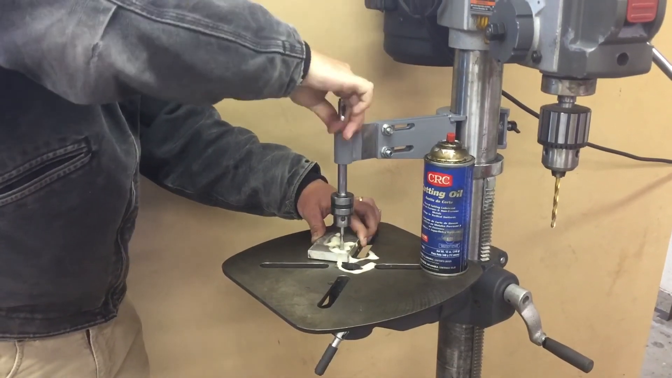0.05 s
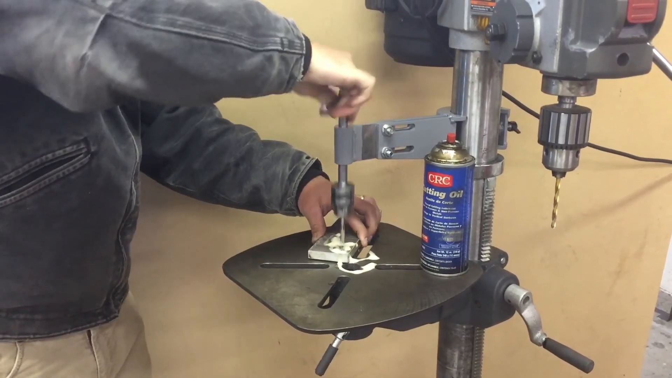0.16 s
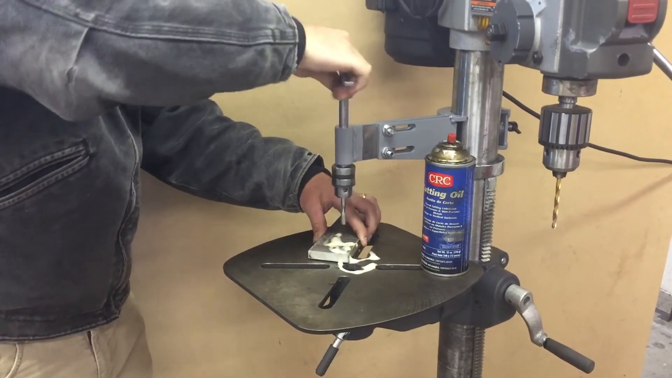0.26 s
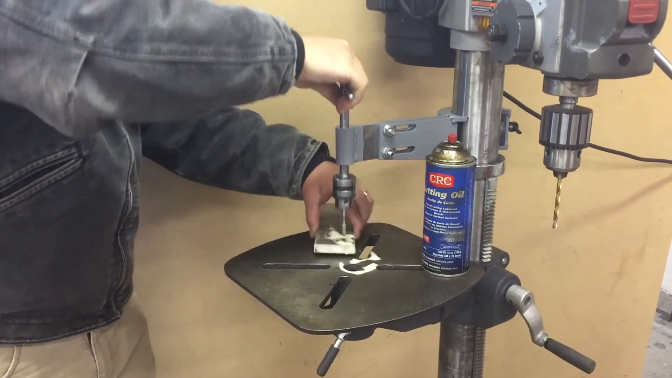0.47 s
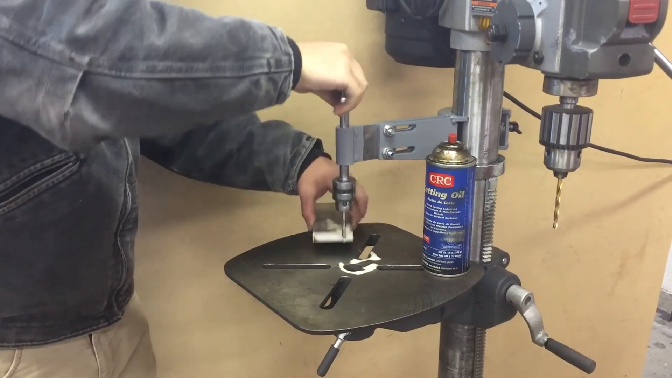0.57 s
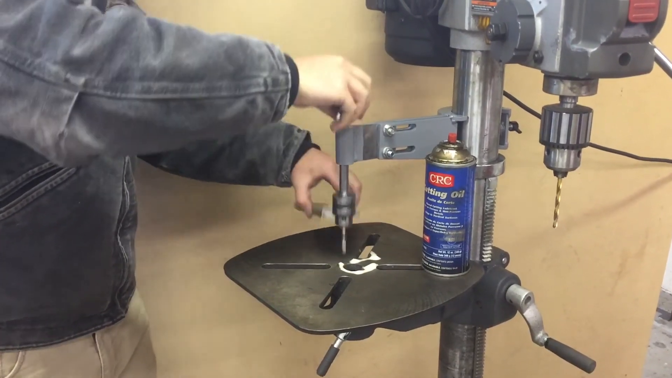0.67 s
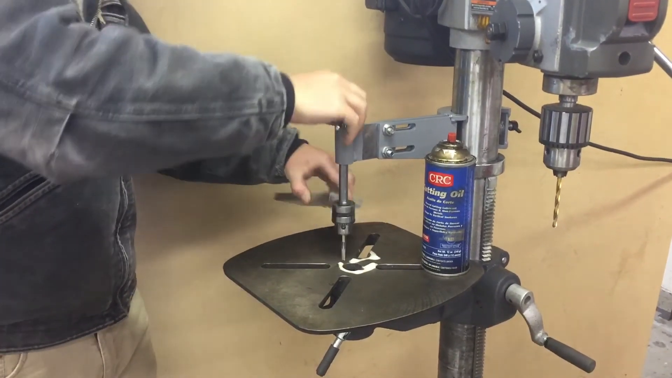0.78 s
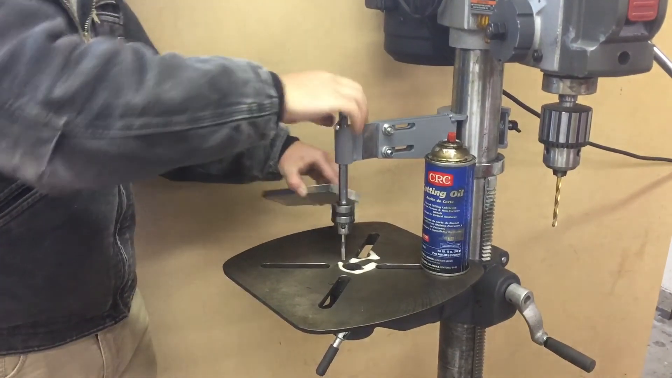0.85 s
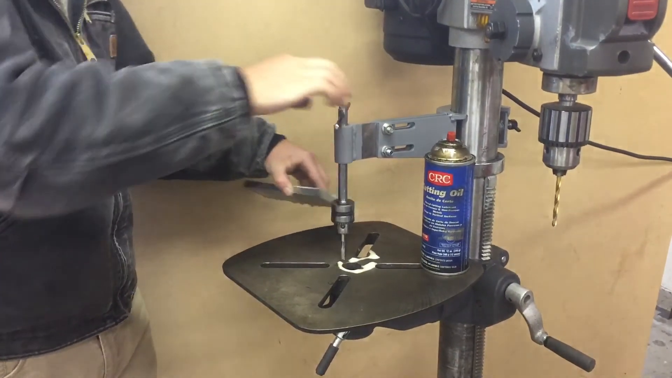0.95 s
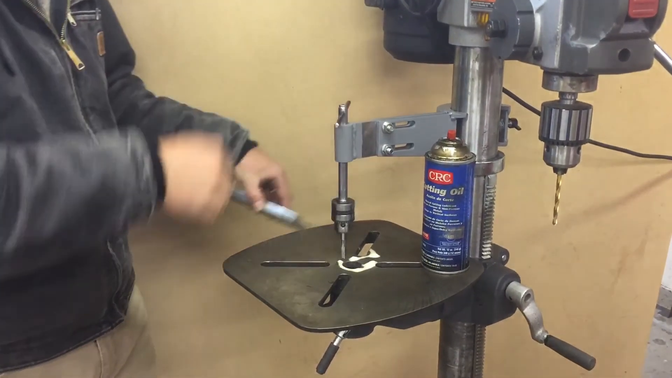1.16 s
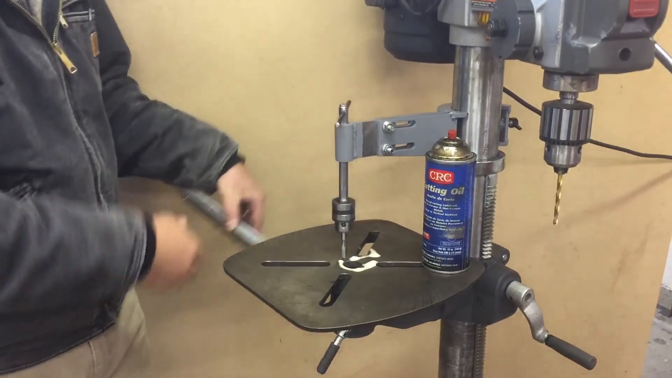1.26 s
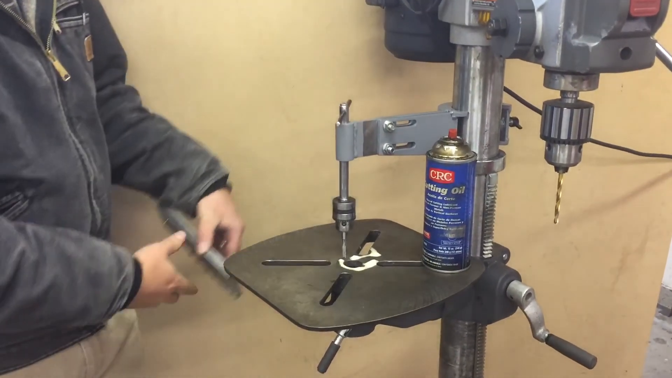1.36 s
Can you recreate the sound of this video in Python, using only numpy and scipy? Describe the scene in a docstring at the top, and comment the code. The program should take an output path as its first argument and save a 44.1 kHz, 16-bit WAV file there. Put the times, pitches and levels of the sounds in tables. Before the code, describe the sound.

A bright metal clack of an aluminium block on a steel table at 0.32 seconds, rattling briefly, after a gritty scrape from 0.2. A thinner ringing graze against the tap follows at 0.4 to 0.5, a faint low squeak near 0.6, then a quiet slide into a duller, chattering clunk at 0.8. Soft thuds and faint sleeve rustle end it over low hum in a small workshop.

```python
"""An aluminium block clacks against the steel of a drill press in a small workshop, as a hand tap comes free.
The freed tap holder slides down its guide and lands on the table with a clunk.
Each blow is clicks and short noise bursts, ringing modes and a fading room tail.
The block also scrapes the table and grazes the tap: tiny random slips make rasp and keep the metal ringing.
Short squeaks and soft thuds join in; a sleeve rustles over a low hum and room air."""
import sys
import numpy as np
from scipy import signal
from scipy.fft import rfft, irfft
from scipy.io import wavfile

SR = 44100
rng = np.random.default_rng(int(sys.argv[2]) if len(sys.argv) > 2 else 0)


def materialize(psi):
    """Save the field psi as 16-bit PCM at rate SR to the path in sys.argv[1].

    A 1-D psi becomes a single channel; in a 2-D psi each row is a channel.
    """
    bounded = np.clip(np.atleast_2d(psi).T, -1, 1)
    quanta = np.round(bounded * 32767).astype(np.int16)
    wavfile.write(sys.argv[1], SR, quanta)


N = 63945
TIME = np.arange(N) / SR  # seconds
BINS_HZ = np.fft.rfftfreq(N, 1 / SR)


def amp(db):
    """Decibels to gain."""
    return 10 ** (np.asarray(db) / 20)


def rms(x):
    """Root-mean-square size of a signal."""
    return np.sqrt(np.mean(x ** 2))


def unit(x):
    """Scales to rms 1."""
    return x / np.sqrt(np.mean(x ** 2) + 1e-20)


def read(points, hz):
    """Reads a table between its points, on a log-frequency axis."""
    f, value = np.transpose(points)
    return np.interp(np.log(hz + 1), np.log(f), value)


def level(curve):
    """Gain over time from a dB curve, falling steeply to silence outside it."""
    s, db = np.transpose(curve)
    outside_s = np.maximum(0, np.maximum(s[0] - TIME, TIME - s[-1]))
    return amp(np.interp(TIME, s, db) - 500 * outside_s)


def colour(x, points):
    """Gives a steady signal a spectrum, at rms 1."""
    return unit(irfft(rfft(x) * amp(read(points, BINS_HZ)), N))


def hiss(points):
    """Coloured noise at rms 1."""
    return colour(rng.standard_normal(N), points)


def onset(start, rise_s):
    """Opens smoothly from 0 towards 1 after the start."""
    return 1 - np.exp(-np.maximum(TIME - start, 0) / rise_s)


def ring_down(start, db, t60):
    """Gain that falls by 60 dB in t60 seconds after the start."""
    return amp(db - 60 * np.maximum(TIME - start, 0) / t60)


def die_away(x, start, early_db=0, early_s=.03):
    """Each band fades at about the room's rate, after a stronger early part."""
    # How fast the room goes quiet. Each row: frequency in Hz, time to fall 60 dB in seconds.
    room_fade = [(150, 0.19), (400, 0.67), (1000, 0.48), (2800, 0.46), (7000, 0.31), (15000, 0.26)]
    hz, t, z = signal.stft(x, SR, nperseg=256)
    age = np.maximum(t - start, 0)
    fade_db = early_db * np.exp(-age / early_s) - 60 * age / read(room_fade, hz)[:, None]
    return signal.istft(z * amp(fade_db), SR, nperseg=256)[1][:N]


def in_room(x):
    """Direct sound plus a diffuse tail, at about unchanged power."""
    wet = amp(-1.5)  # tail beside the direct sound
    tail = die_away(rng.standard_normal(N), 0) * onset(0.0044, 0.00053)
    tail = tail / np.linalg.norm(tail)
    return (x + wet * signal.fftconvolve(x, tail)[:N]) / np.hypot(1, wet)


def narrow(hz, width_hz):
    """A crowd of close frequencies: a rough, wavering ring at rms 1."""
    off = (BINS_HZ - hz) / width_hz
    random_phase = np.exp(2j * np.pi * rng.random(len(off)))
    return unit(irfft(random_phase / (1 + 2 * off ** 2), N))


def cracks(contacts, spectrum, rise_s, t60):
    """A sharp click and a very short noise burst at each contact."""
    snap_db = 6  # click relative to its burst
    power = sum((onset(s, rise_s) * ring_down(s, db, t60)) ** 2 for s, db in contacts)
    burst = hiss(spectrum) * np.sqrt(power)
    clicks = sum(amp(db + snap_db) * (np.arange(N) == round((s + rise_s) * SR)) for s, db in contacts)
    shape = amp(read(spectrum, BINS_HZ))
    return burst + irfft(rfft(clicks) * shape / shape.mean(), N)


def struck(start, modes, rise_s):
    """Modes ringing down after a blow, each beating with a close, weaker neighbour."""
    beat_hz, beat_db = 11, -14  # typical distance and relative level of the neighbour
    age = np.maximum(TIME - start, 0)
    out = np.zeros(N)
    for (hz, db, t60), (a, b, split) in zip(modes, rng.random((len(modes), 3))):
        side = (-1) ** int(2 * b)  # neighbour above or below
        near_hz = hz + beat_hz * (.5 + split) * side
        out += ring_down(start, db, t60) * np.sin(2 * np.pi * (hz * age + a))
        out += ring_down(start, db + beat_db, t60) * np.sin(2 * np.pi * (near_hz * age + 2 * b))
    return onset(start, rise_s) * out


def shimmer(start, clusters):
    """Clusters of close modes ringing down after a blow."""
    crowd = sum(narrow(hz, width) * ring_down(start, db, t60) for hz, width, db, t60 in clusters)
    return onset(start, .002) * crowd


def slips():
    """Tiny stick-slip clicks of uneven size at random moments, at rms 1."""
    grains_per_s, spread_db = 2500, 3  # averages
    size = amp(spread_db * np.minimum(rng.exponential(1, N), 4))
    sign = rng.choice([-1, 1], N)
    return unit(size * sign * (rng.random(N) < grains_per_s / SR))


def clumps():
    """Gain that wavers quickly as the surfaces grip and let go."""
    depth_db, speed_hz = 0.5, 132
    return unit(amp(depth_db * np.clip(narrow(0, 2 * speed_hz), -2, 2)))


def rubbed(curve, modes):
    """Slips keep a set of modes ringing, each with its share of the power."""
    force = level(curve)
    drive = slips() * force
    out = np.zeros(N)
    for hz, db, t60 in modes:
        one_slip = ring_down(0, 0, t60) * np.sin(2 * np.pi * hz * TIME)
        out += amp(db) * unit(signal.fftconvolve(drive, one_slip)[:N])
    return unit(out) * rms(force)


def block_clack():
    """The aluminium block hits steel and rattles: bright cracks, a ring and the room."""
    # The contacts. Each row: start in seconds, level in dB.
    contacts = [(.3184, -10.5), (.3197, -8.5), (.3215, -13), (.3247, -12.5), (.3275, -22.5), (.3307, -22),
                (.3358, -27.5)]
    # Tone of the cracks, then of the room tail. Each row: frequency in Hz, relative level in dB.
    crack_tone = [(100, -26), (400, -15.5), (1000, -1), (2200, -0.5), (3800, 6), (5500, 3.5), (8000, -6.5),
                  (10500, 1), (13000, -7.5), (16000, -4)]
    tail_tone = [(60, -39), (150, -16), (300, -0.5), (600, -0.5), (930, -11), (1200, 0), (1600, -3),
                 (2300, 1), (3300, 0.5), (5000, -2.5), (8000, -13.5), (11000, -15), (12300, -21.5),
                 (14500, -16), (16000, -36)]
    # Ringing of the block. Each row: frequency in Hz, level in dB, time to fall 60 dB in seconds.
    block_modes = [(383, -33, 0.7), (567, -36.5, 0.66), (800, -32.5, 0.32), (1168, -35.5, 0.33),
                   (2070, -34, 0.37), (2233, -24, 0.16), (3060, -30, 0.37), (3147, -23.5, 0.1),
                   (3250, -31.5, 0.17), (3660, -29, 0.22)]
    # Its crowded top modes. Each row: centre in Hz, width in Hz, level in dB, time to fall 60 dB in seconds.
    top_modes = [(5400, 160, -40, 0.59), (9770, 200, -35, .22), (10790, 100, -38, 0.29),
                 (14200, 900, -45.5, .18)]
    start = contacts[0][0]
    tail = die_away(hiss(tail_tone), start, early_db=6.0, early_s=0.026)
    crack = cracks(contacts, crack_tone, rise_s=0.00034, t60=0.013)
    ring = struck(start, block_modes, rise_s=0.0025) + shimmer(start, top_modes)
    return crack + ring + amp(-23.5) * tail * onset(start, 0.0038)


def holder_clunk():
    """The tap holder lands and chatters on the table: duller blows, a ring and the room."""
    # The contacts, then bright ticks of the holder's loose parts. Each row: start in seconds, level in dB.
    contacts = [(.8047, -25.5), (.8061, -17.5), (.8125, -18.5), (.8148, -31.5), (.8195, -19.5),
                (.8255, -28), (.837, -31)]
    tick_times = [(.8045, -36), (.8110, -38), (.8217, -30), (.8336, -40)]
    # Tone of the blows, the ticks and the room tail. Each row: frequency in Hz, relative level in dB.
    blow_tone = [(60, -15), (200, -12.5), (550, 0.5), (950, 8), (1600, -3.5), (2700, 1), (4200, -27),
                 (7000, -21.5), (10000, -25.5), (15500, -28.5)]
    tick_tone = [(1500, -20), (4000, -12), (6000, 8), (9000, -2), (12500, -1), (15000, 1.5)]
    tail_tone = [(60, -69), (150, -1.5), (400, -10), (600, -9), (950, -0.5), (1500, -3), (2100, -7),
                 (2900, -4.5), (3500, -10), (4300, -17), (5500, -18.5), (8000, -25), (11000, -28.5),
                 (14500, -31), (16000, -31)]
    # Ringing of the table. Each row: frequency in Hz, level in dB, time to fall 60 dB in seconds.
    table_modes = [(286.4, -37.5, 0.5), (563, -24, 0.29), (660, -25.5, 0.43), (691.3, -27.5, 0.47),
                   (943, -35.5, 0.52), (985, -27, 0.087), (1070, -29.5, 0.38), (1176, -25.5, 0.28),
                   (1517, -30, 0.49), (1793, -23, 0.36), (1883, -34.5, 0.5), (2463, -19.5, 0.14),
                   (2776, -23, 0.23), (2907, -23, 0.22), (2910, -38, 0.55), (862, -34, 0.43)]
    # Its crowded upper modes. Each row: centre in Hz, width in Hz, level in dB, time to fall 60 dB in seconds.
    upper_modes = [(3800, 270, -36, 0.22), (4295, 100, -34, 0.26), (5330, 130, -42, 0.2)]
    start = contacts[0][0]
    tail = die_away(hiss(tail_tone), start, early_db=2.5, early_s=0.055)
    ticks = cracks(tick_times, tick_tone, rise_s=0.00021, t60=0.032)
    ring = struck(start, table_modes, rise_s=0.013) + shimmer(start, upper_modes)
    blows = cracks(contacts, blow_tone, rise_s=0.00052, t60=0.032)
    return blows + ticks + ring + amp(-25.5) * tail * onset(start, 0.0074)


def rubbing():
    """Block on table, block on tap, holder in its guide: slips rasp in the room and keep the parts ringing."""
    # Strength of each rubbing. Each row: time in seconds, level in dB.
    scrape = [(.172, -73), (.185, -52.5), (.204, -38.5), (.216, -32), (.222, -32.5), (.245, -35.5),
              (.268, -44), (.316, -35.5), (.335, -64)]
    graze = [(.39, -61), (.405, -43), (.44, -49.5), (.476, -47.5), (.485, -37), (.502, -39.5),
             (.515, -58.5), (.56, -58), (.59, -70.5)]
    slide = [(.635, -67), (.665, -51.5), (.70, -50), (.735, -47.5), (.76, -48), (.803, -45.5), (.815, -79)]
    # Tone of each rasp. Each row: frequency in Hz, relative level in dB.
    scrape_tone = [(60, -28), (180, -20.5), (400, -2), (900, -5), (1400, 0.5), (2200, -0.5), (3500, -2.5),
                   (5500, -20), (9000, -22.5), (11000, -35), (15500, -35.5)]
    graze_tone = [(60, -23.5), (150, 7), (400, 2.5), (900, -7.5), (2000, -1), (4400, -3.5), (6000, -11.5),
                  (10000, -26.5), (15500, -38)]
    slide_tone = [(60, -15), (280, -33), (500, 14), (850, -5), (1270, -1), (1500, -2), (1900, 6),
                  (2800, -1.5), (4100, -8.5), (5200, -16), (9000, -26.5), (15500, -29)]
    # Ringing of block, tap and holder. Each row: frequency in Hz, relative level in dB,
    # time to fall 60 dB in seconds.
    block_modes = [(1865, 1, 0.055), (2127, 3, 0.045), (2352, 7, 0.12), (2790, -8, 0.05), (3145, -1.5, .06),
                   (3850, -5.5, 0.039), (5344, -8, 0.025), (6050, -10.5, .015), (13550, -22, .012)]
    tap_modes = [(934, -10, 0.2), (1640, -0.5, 0.33), (1826, -3.5, .18), (2800, -1.5, 0.39),
                 (3380, -6.5, 0.24), (3425, 0, 0.64), (4290, 3.5, 0.08), (4570, -2.5, 0.06),
                 (5093, -14, .18), (8600, -11, 0.05), (9700, -9, 0.03), (13910, -16.5, 0.08)]
    holder_modes = [(1214, -1.5, 0.07), (1660, -1.5, 0.04), (1838, -3.5, 0.041), (2440, -6, 0.033)]
    rasp = colour(slips(), scrape_tone) * level(scrape)
    rasp += colour(slips(), graze_tone) * level(graze)
    rasp += colour(slips(), slide_tone) * level(slide)
    catches = edge_catches()
    ring = amp(-3) * rubbed(scrape, block_modes)
    ring += amp(-1) * rubbed(graze, tap_modes)
    ring += amp(-3.5) * rubbed(slide, holder_modes)
    return in_room(amp(-1.5) * rasp * clumps() + catches) + ring


def edge_catches():
    """The block's edge catches on the table, then on the tap: small cracks."""
    # The catches. Each row: start in seconds, level in dB.
    catch_times = [(.2030, -39), (.2180, -28), (.2220, -27), (.2815, -33.5), (.4815, -43), (.4960, -45)]
    # Their tone. Each row: frequency in Hz, relative level in dB.
    catch_tone = [(300, -12.5), (2300, 7), (5500, 0.5), (9000, -8.5), (12000, -23), (15500, -28)]
    return cracks(catch_times, catch_tone, rise_s=0.00095, t60=0.036)


def press_groan():
    """The low ring that the rubbing draws from the press, driven by its own slips."""
    # Strength of the low ring. Each row: time in seconds, level in dB.
    strength = [(.18, -66.5), (.225, -42), (.31, -37), (.38, -42.5), (.46, -48), (.55, -49.5), (.63, -63.5),
                (.675, -47.5), (.75, -51), (.81, -60)]
    # Ringing of the press. Each row: frequency in Hz, relative level in dB, time to fall 60 dB in seconds.
    press_modes = [(317, -13, .1), (385.6, -3.5, 0.2), (426, 1, 0.093), (500, -2, 0.16), (571, -3.5, .14),
                   (675, 3, 0.27)]
    return rubbed(strength, press_modes)


def squeaks():
    """Metal rubbing on metal squeaks briefly: narrow noise that swells and fades."""
    # Each row: loudest moment in seconds, length in seconds, pitch in Hz, width in Hz, level in dB.
    squeak_list = [(.588, .062, 676, 12, -48.5), (.738, .03, 3710, 80, -58), (.778, .026, 3860, 160, -57)]
    out = np.zeros(N)
    for peak_s, length_s, hz, width_hz, db in squeak_list:
        swell = np.exp(-2 * ((TIME - peak_s) / length_s) ** 2)
        out += amp(db) * unit(swell * narrow(hz, width_hz)) * rms(swell)
    return out


def bumps():
    """Handling the parts makes soft low thuds: a few slow-rising low modes."""
    # The thuds. Each row: start in seconds, level in dB.
    thuds = [(0.338, -38), (0.412, -36.5), (0.808, -68), (0.918, -41), (1.035, -42.5)]
    # Their ringing. Each row: frequency in Hz, level relative to the thud in dB, time to fall 60 dB in seconds.
    thud_modes = [(144, -5.5, 0.23), (159, -0.5, 0.21), (188, -3, .15)]
    return sum(amp(db) * struck(s, thud_modes, rise_s=0.026) for s, db in thuds)


def sleeve():
    """A jacket sleeve rustles: coloured slips of the cloth in the room."""
    # Strength of the rustle. Each row: time in seconds, level in dB.
    strength = [(0, -72.5), (.15, -73), (1.08, -62), (1.16, -65.5), (1.21, -64), (1.29, -72.5),
                (1.318, -58), (1.37, -71), (1.45, -67.5)]
    # Its tone. Each row: frequency in Hz, relative level in dB.
    cloth_tone = [(60, 5), (170, 13), (400, -10), (1000, 3.5), (3000, -2), (5000, -11.5), (9000, -18.5),
                  (15500, -22)]
    return in_room(colour(slips(), cloth_tone) * level(strength))


def machine_hum():
    """A low machine hum: one sine wave of changing strength."""
    # Strength of the hum. Each row: time in seconds, rms level in dB.
    strength = [(0, -57.5), (.32, -57), (.5, -54.5), (.78, -51), (.92, -54.5), (1.05, -52.5), (1.45, -53.5)]
    hum_hz = 78.1
    return np.sqrt(2) * level(strength) * np.sin(2 * np.pi * (hum_hz * TIME + rng.random()))


def room_air():
    """Steady room air: noise that is strongest in the bass."""
    # Tone of the air. Each row: frequency in Hz, relative level in dB.
    air_tone = [(20, -23), (35, -5.5), (50, 14), (100, -2), (160, 1), (300, -7.5), (700, -13),
                (2000, -23.5), (6000, -25.5), (15500, -32.5)]
    return amp(-61) * hiss(air_tone)


def scene():
    """Everything at one microphone."""
    friction = rubbing() + press_groan() + squeaks()
    blows = block_clack() + holder_clunk() + bumps()
    background = machine_hum() + room_air() + sleeve()
    return (friction + blows + background)[None]


def record(dry):
    """The microphone's bass roll-off, then a steep band limit."""
    rumble_cut_hz, edge_hz = 48, 15900
    bass_cut = signal.butter(4, rumble_cut_hz, "high", fs=SR, output="sos")
    thin = signal.sosfilt(bass_cut, dry)
    treble_cut = signal.firwin(401, edge_hz, window=("kaiser", 9), fs=SR)
    return signal.oaconvolve(thin, treble_cut[None], "same")


dry = scene()
out = record(dry)
materialize(out)
```